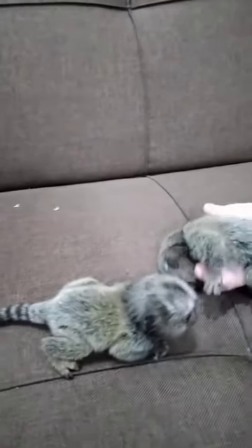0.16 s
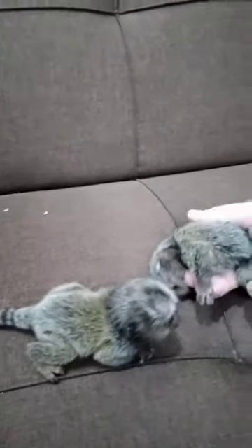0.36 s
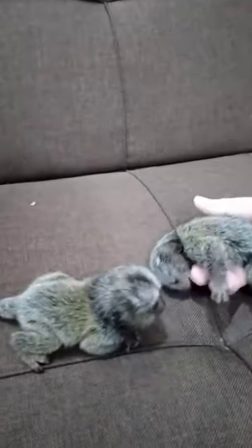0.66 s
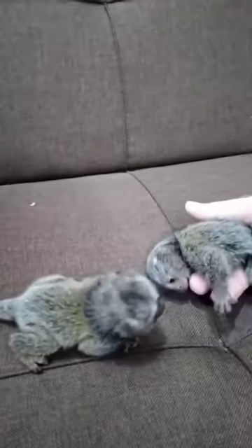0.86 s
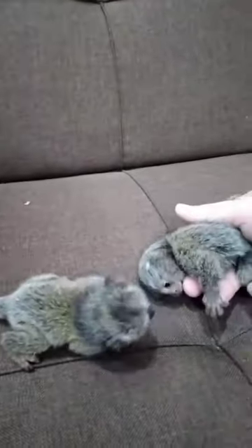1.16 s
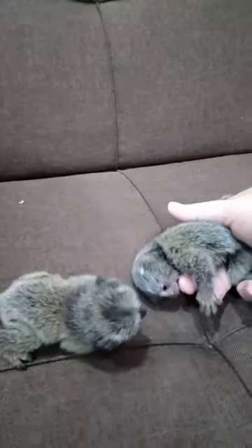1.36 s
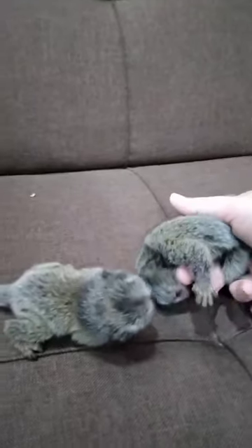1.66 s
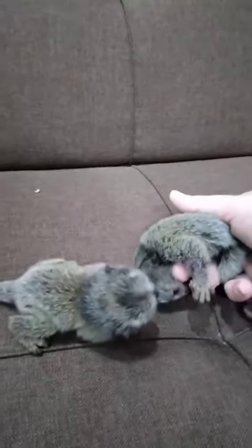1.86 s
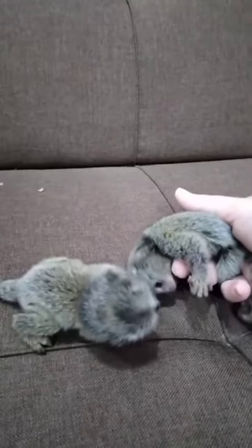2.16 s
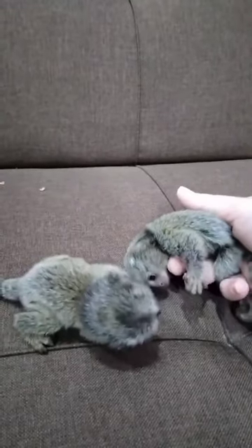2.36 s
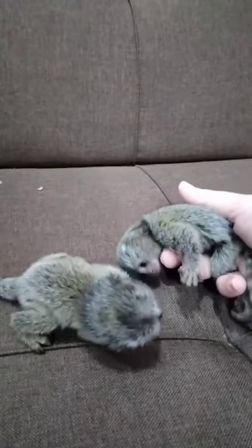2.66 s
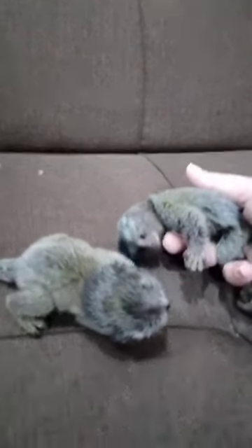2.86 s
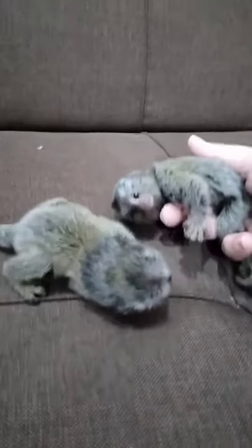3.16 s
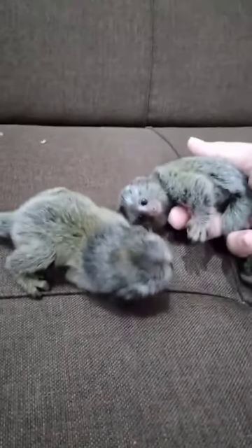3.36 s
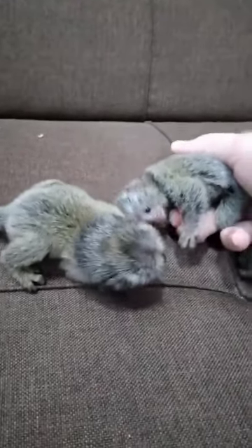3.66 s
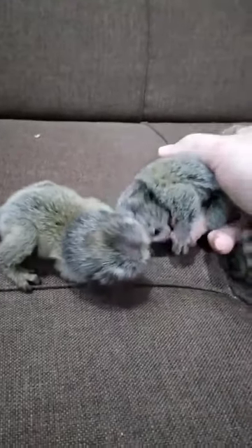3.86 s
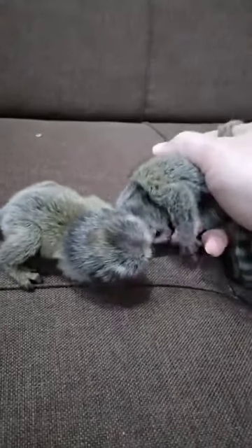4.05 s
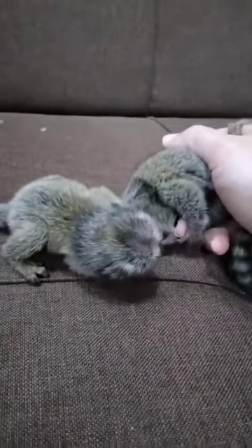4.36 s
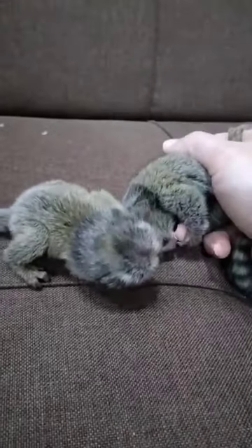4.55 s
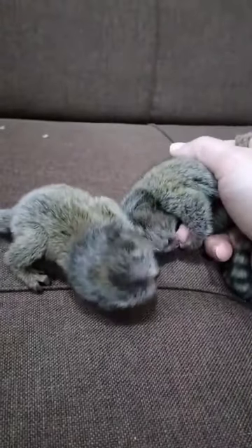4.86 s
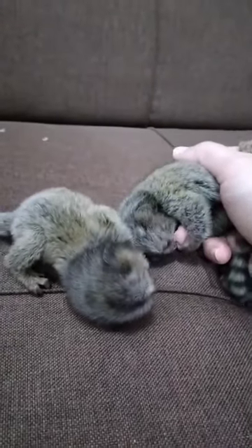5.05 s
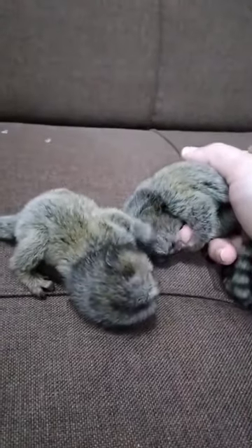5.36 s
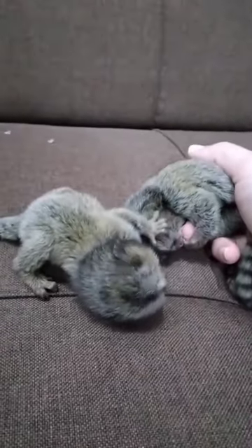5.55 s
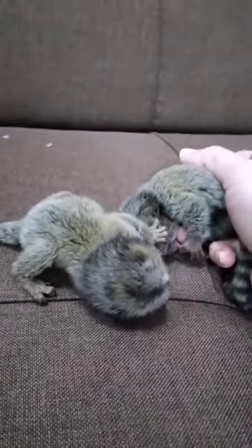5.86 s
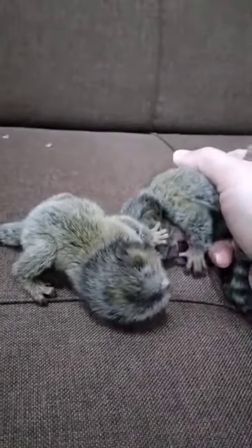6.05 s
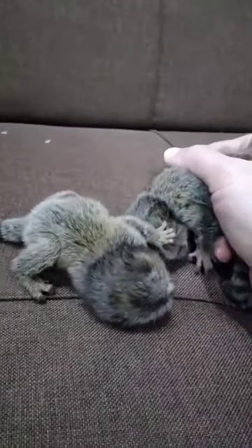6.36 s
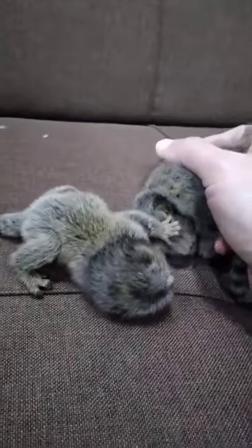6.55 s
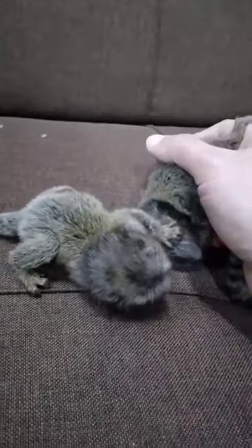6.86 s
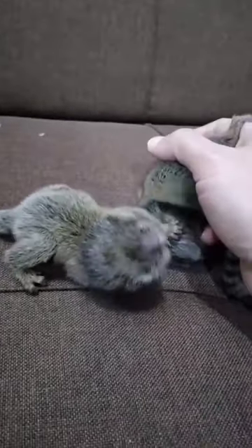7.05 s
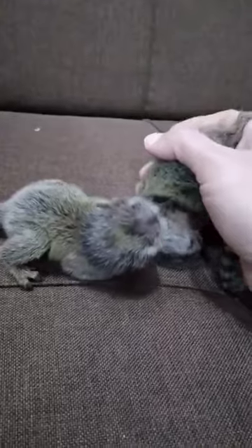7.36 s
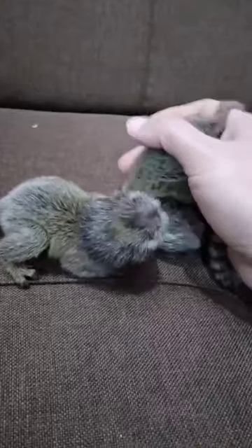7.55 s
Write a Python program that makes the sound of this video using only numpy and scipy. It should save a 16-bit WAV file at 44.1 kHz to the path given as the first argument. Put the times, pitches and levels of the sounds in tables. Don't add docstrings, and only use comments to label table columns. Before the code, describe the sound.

A small room with soft furniture, heard through a phone in mono: quiet hiss, a flickering airy sizzle and thin insect-like trills around five kilohertz, with shriller strokes near nine, run throughout over a faint low engine hum. At 0.2 s a baby monkey gives a tight double chirp near three kilohertz; a weaker falling chirp follows at 0.85 s. The double chirp returns louder at 2.2 s. Quick squeaks shoot upward at 2.7, 3.0 and 3.5 s. From 4.1 to 4.4 s comes the loudest event, a piercing cluster of whistled notes with a bright held core, its echoes dying quickly. Softer rising chirps and peeps scatter afterwards, with another squeak at 5.3 s. Outside, the engine's deep boom swells strongly by 5.9 s, buzzing unsteadily and sagging slightly in pitch. A last double chirp sounds at 6.8 s, then faint notes near 7.3 s as the boom eases.

```python
import sys
import numpy as np
from scipy import signal
from scipy.fft import rfft, irfft
from scipy.io import wavfile
from scipy.ndimage import uniform_filter1d

SR = 44100
rng = np.random.default_rng(int(sys.argv[2]) if len(sys.argv) > 2 else 0)


def voltage_ratio(level):
    return 10 ** (np.asarray(level, float) / 20)


def transcribe(signal):
    frames = np.atleast_2d(signal).T
    limited = np.clip(frames, -1, 1)
    pcm = np.round(limited * 32767).astype(np.int16)
    wavfile.write(sys.argv[1], SR, pcm)


N = 339570

# (frequency [Hz], density [dB per Hz])
HISS_COLOUR = [(12, -49), (20, 8), (44, -0.5), (112, -7), (161, -12.5), (232, -11), (281, -15), (631, -20),
               (1300, -21), (3850, -29.5), (5230, -20), (6910, -31.5), (8880, -24), (11400, -30),
               (15500, -31)]
HISS_DB, ROAD_FOLLOWS = -64, 0.16
# (time [s], peak level [dB])
SIZZLE_SWELLS = [(0.0263, -58), (0.178, -60), (0.2843, -58), (0.4564, -60), (0.6893, -58), (0.9043, -54),
                 (1.1164, -60), (1.4182, -64), (1.714, -62), (1.949, -59), (2.2692, -56), (2.6105, -53),
                 (2.7107, -56), (2.823, -55), (3.1867, -65), (3.4451, -58), (3.6546, -52), (3.8701, -55),
                 (3.9903, -53), (4.2378, -54), (4.5526, -58), (4.8499, -54), (5.4256, -57), (5.7364, -57),
                 (6.0731, -56), (6.3684, -59), (6.9691, -60), (7.224, -58), (7.4545, -59), (7.6141, -58)]
SWELL_RISE_S, SWELL_FALL_S, SIZZLE_REST_DB = 0.019, 0.047, -60.5
SIZZLE_REACHES_DOWN = 0.49

# (time [s], boom through the walls [dB], exhaust buzz [dB])
ENGINE_LEVELS = [(0.0, -67, -69.5), (0.36, -60.5, -63), (1.18, -62.5, -58), (2.66, -55.5, -58),
                 (2.94, -56, -54), (3.54, -50, -63.5), (4.18, -47, -58), (5.17, -46, -55),
                 (5.88, -35.5, -63), (6.26, -36, -52), (6.4, -36, -55.5), (6.82, -37.5, -50.5),
                 (7.06, -37.5, -64), (7.25, -37, -54.5), (7.7, -42.5, -47)]
# (time [s], firing rate [Hz])
FIRING_RATE = [
    (0, 58.92),
    (2.6, 58.37),
    (4.4, 57.92),
    (5.3, 57.14),
    (5.9, 56.21),
    (7.7, 54.97),
]
# (multiple of firing rate, level against the boom [dB])
UPPER_MULTIPLES = [(6, -37), (7, -37), (8, -50.5), (9, -36.5)]
# (multiple of firing rate, level [dB])
BUZZ_MULTIPLES = [(3, -72.5), (4, -74.5), (5, -84.5)]
# (time [s], half length [s], third multiple lift [dB], fourth [dB], fifth [dB])
BUZZ_LIFTS = [(.5, 0.25, 3.7, 2.3, -2), (2.55, 0.12, 6.7, 10.4, -1), (3.45, 0.34, 2, 11, 5),
              (4.9, 0.32, 16, 8.8, 0), (5.5, 0.23, 10, 14.2, 5), (5.93, 0.2, 12.6, 17.2, 12),
              (6.25, 0.14, 4, 14.7, 11), (6.72, 0.24, 9, 13.7, 20), (7.1, .06, 2, 15, 11),
              (7.35, 0.17, 8.1, 6.8, -1), (7.6, 0.2, 4.8, 13.2, 13)]
# (frequency [Hz], level [dB])
FAN_TONES = [(76, -67.5), (574, -80)]

# (low [Hz], high [Hz], ring-out t60 [s])
NEAR_BAND, LOW_BAND, MID_BAND, HIGH_BAND = (4960, 5520, .44), (4620, 4900, 0.45), (5250, 5480, 0.42), (5720, 5850, 0.29)
# (time [s], length [s], level [dB])
NEAR_STROKES = [(0.182, 0.082, -58.5), (0.6, 0.078, -58.5), (0.945, 0.078, -57.5), (1.24, 0.07, -66),
                (1.474, 0.076, -58.5), (1.75, .037, -76), (2.014, .12, -57.5), (2.509, 0.092, -58.5),
                (2.931, 0.086, -58), (3.349, 0.07, -56.5), (3.585, 0.049, -62.5), (3.805, 0.15, -57),
                (4.469, 0.09, -57.5), (4.658, 0.052, -62.5), (5.12, .061, -58.5), (5.449, .091, -71),
                (5.712, 0.098, -58.5), (6.139, 0.051, -71), (6.214, 0.11, -58), (6.726, 0.056, -62.5),
                (6.845, 0.07, -59.5), (7.0, 0.087, -68), (7.34, 0.037, -63), (7.52, .11, -57)]
# (time [s], length [s], level [dB])
LOW_STROKES = [(0.428, 0.046, -75), (0.755, 0.02, -66), (1.76, 0.065, -78), (2.4, .06, -69),
               (3.2, 0.063, -76), (7.355, 0.04, -62), (1.434, 0.076, -66), (1.873, .12, -67),
               (3.755, 0.085, -57.5), (4.062, 0.035, -61), (4.3, 0.06, -66), (4.925, 0.057, -63),
               (5.646, 0.038, -68), (5.973, 0.044, -66), (6.259, 0.056, -63), (6.497, 0.13, -65),
               (7.217, 0.12, -69), (7.622, 0.045, -62)]
# (time [s], length [s], level [dB])
MID_STROKES = [(0, .028, -65), (1.601, 0.052, -77), (1.836, .062, -69), (2.345, 0.077, -65),
               (2.715, 0.096, -63), (4.16, 0.15, -63), (4.864, 0.046, -63), (6.354, 0.039, -68)]
# (time [s], length [s], level [dB])
HIGH_STROKES = [(1.931, 0.077, -65), (3.54, 0.045, -65), (4.88, .04, -66), (5.236, .06, -62.5),
                (6.021, 0.057, -65), (6.918, 0.036, -66), (7.601, 0.065, -65)]
# (time [s], top of sweep [Hz], level [dB])
SHRILL_STROKES = [(0.017, 9440, -71), (0.323, 9650, -65.5), (.575, 9500, -63.5), (1.14, 8700, -66.5),
                  (1.2, 10000, -66.5), (1.538, 8800, -68), (1.686, 9170, -64.5), (2.054, 9760, -64.5),
                  (2.402, 8900, -67), (2.48, 9600, -68), (2.615, 9560, -67), (3.02, 9430, -72),
                  (3.29, 9240, -65), (3.527, 9900, -61.5), (3.859, 10270, -62.5), (4.02, 10000, -60.5),
                  (4.49, 10150, -64), (4.711, 10000, -64.5), (5.13, 9900, -60), (5.274, 10090, -63),
                  (5.451, 9300, -65), (5.94, 9100, -66.5), (6.067, 9300, -66.5), (6.312, 8990, -70),
                  (6.59, 10340, -60), (6.888, 9910, -63), (7.127, 9350, -62), (7.361, 9830, -63.5),
                  (7.63, 9500, -65)]
SHRILL_LOW_HZ, SHRILL_S, SHRILL_T60_S = 8250, .045, 0.41
# (time [s], start [Hz], end [Hz], level [dB])
PEEP_NOTES = [(0.176, 6280, 6760, -69), (0.854, 6480, 5630, -64), (2.185, 6950, 6330, -67),
              (2.19, 5980, 6000, -69), (3.523, 6800, 6680, -64), (3.985, 6660, 6880, -61.5),
              (4.175, 6640, 7430, -65.5), (4.705, 6720, 6900, -64), (2.701, 6100, 6950, -61.5),
              (2.96, 6260, 6900, -64), (5.26, 6500, 7040, -66), (6.22, 3430, 4230, -69),
              (4.75, 3910, 4500, -64), (.19, 10300, 10800, -69), (2.22, 10200, 10900, -70),
              (4.218, 9850, 10900, -66.5), (4.84, 10070, 11330, -60.5), (6.854, 10730, 9900, -66)]
PEEP_S, PEEP_T60_S = 0.034, 0.54

# (time [s], level [dB])
DOUBLE_CHIRPS = [
    (0.174, -51),
    (2.188, -49.5),
    (6.816, -49.5),
]
HIGH_NOTE, LOW_NOTE = (3340, 3180, .028), (3030, 2790, .028)  # (start [Hz], end [Hz], length [s])
LOW_NOTE_LAG_S, HIGH_NOTE_DB, DOUBLE_DIRECT = 0.014, -4, 18
# (time [s], start [Hz], end [Hz], length [s], level [dB])
CRY_OPENING = [
    (4.076, 3000, 3780, 0.04, -42.5),
    (4.09, 2824, 2840, 0.019, -54.5),
    (4.19, 3680, 3770, .02, -66),
]
# (time [s], start [Hz], end [Hz], length [s], level [dB])
CRY_CORE = [
    (4.221, 2370, 2460, .026, -43.5),
    (4.265, 2545, 2610, 0.064, -37.5),
    (4.333, 3255, 3280, 0.055, -47),
]
# (time [s], start [Hz], end [Hz], length [s], level [dB])
CRY_NOTES = [
    (4.188, 2166, 2450, 0.0404, -55),
    (4.222, 2620, 3100, 0.03, -45),
    (4.292, 3990, 3900, 0.015, -66),
    (4.354, 2500, 2780, 0.061, -48.5),
]
OPENING_T60_S, CORE_T60_S, CORE_DIRECT = 0.4, 0.5, 130
# (time [s], start [Hz], level [dB])
FALLING_CHIRPS = [
    (0.071, 3270, -70),
    (0.853, 3395, -61.5),
    (1.138, 2140, -63),
    (3.375, 2660, -67.5),
    (6.192, 3094, -60),
    (1.702, 3600, -73),
]
FALL_RATIO, FALL_S = .79, .031
# (time [s], start [Hz], end [Hz], level [dB])
RISING_CHIRPS = [(1.939, 3100, 3270, -62), (2.065, 2500, 2900, -67), (2.583, 2510, 3010, -64.5),
                 (3.851, 2640, 3165, -65.5), (4.915, 2250, 2560, -60.5), (5.72, 2896, 3450, -66),
                 (5.77, 3240, 3930, -63.5), (5.775, 2406, 2650, -64), (5.925, 2950, 3880, -64),
                 (6.68, 2867, 3930, -69), (6.715, 2400, 2700, -67)]
RISE_S = 0.047
# (time [s], start [Hz], end [Hz], length [s], level [dB])
WHISTLE_NOTES = [(1.714, 3280, 3270, 0.21, -70), (2.679, 2920, 2960, 0.02, -73),
                 (4.82, 3500, 3545, 0.04, -56), (4.969, 515, 515, 0.08, -65),
                 (5.319, 3296, 3285, 0.03, -61), (5.381, 2655, 2555, 0.031, -65),
                 (5.905, 3140, 3190, 0.1, -64), (6.027, 1462, 1363, 0.035, -67),
                 (6.229, 1557, 1630, 0.018, -69), (7.133, 3070, 2674, 0.0407, -62.5),
                 (7.309, 2900, 2750, 0.021, -77), (2.174, 2350, 2290, 0.028, -74),
                 (4.684, 2750, 2956, 0.062, -60.5), (2.58, 3480, 3590, .03, -74)]
NEAR_T60_S, CRY_T60_S, FAR_T60_S, WHISTLE_T60_S = 0.33, 0.44, 0.59, 0.42

# (time [s], start [Hz], end [Hz], length [s], level [dB])
AIMED_NOTES = [(.19, 2970, 2930, .019, -48.5), (2.69, 2810, 2880, .022, -62),
               (2.706, 3500, 3620, .016, -64), (2.995, 2800, 2880, 0.018, -63),
               (4.982, 2480, 2520, .03, -59), (5.85, 2440, 2480, .02, -68), (6.203, 3000, 2720, 0.021, -63),
               (6.256, 2450, 2420, .025, -66), (5.982, 3170, 3180, .045, -62), (6.07, 3190, 3180, .08, -69),
               (6.835, 2980, 2800, .04, -56), (4.9, 3800, 3230, .025, -68), (4.42, 2500, 2740, 0.0608, -53),
               (7.31, 2720, 2950, .04, -64), (.875, 3200, 3050, .02, -64), (.885, 2780, 2700, .02, -67),
               (7.143, 3050, 2900, .025, -64), (4.71, 2750, 3000, .04, -63), (4.11, 3400, 3560, .03, -50),
               (4.13, 3560, 3330, .03, -51)]
AIMED_T60_S, AIMED_DIRECT = .25, 90
# (time [s], start [Hz], end [Hz], length
# [s], level [dB])
FAINT_NOTES = [(4.022, 3120, 2500, .035, -60), (4.878, 3590, 3630, .045, -55.5),
               (4.99, 4080, 3850, .025, -69), (6.06, 2080, 2080, 0.048, -73), (7.24, 3200, 3520, .08, -71),
               (7.2, 2830, 2760, .07, -68), (6.89, 2790, 2750, .03, -66), (6.1, 2800, 2760, .04, -70),
               (4.2, 2800, 4200, .03, -60), (4.3, 2900, 2150, .06, -58), (4.9, 2050, 3400, .08, -65),
               (1.245, 5280, 5520, .06, -66.5), (1.08, 5400, 5000, .03, -73), (.845, 5400, 6500, .04, -71),
               (1.935, 2150, 2250, 0.032, -73), (1.705, 3270, 3290, .02, -72), (1.56, 5000, 5540, .06, -69),
               (7.31, 2720, 2700, .03, -69), (4.975, 2470, 2530, .05, -59.5), (3.99, 4900, 3900, .05, -64),
               (2.585, 2600, 4200, .05, -68), (.19, 5400, 6000, .04, -66), (4.46, 2780, 2620, .09, -64),
               (5.32, 2750, 2560, .05, -65), (2.815, 5300, 5500, .02, -66), (3.3, 6000, 6400, .04, -75),
               (3.9, 4700, 4100, .08, -70), (3.54, 5750, 5800, .06, -67), (3.42, 2150, 2050, .03, -72),
               (4.77, 3100, 4400, .05, -66), (3.51, 2680, 2760, .03, -68), (3.03, 2900, 4200, .03, -66),
               (5.3, 3300, 4700, .025, -66), (4.86, 3700, 5000, .03, -66), (4.03, 3200, 4300, .03, -68),
               (3.6, 3000, 4800, .04, -65), (2.72, 3600, 6000, .03, -66), (3.0, 3800, 5200, .03, -68),
               (4.4, 3270, 3260, .05, -60), (4.24, 2750, 3050, .025, -55), (5.28, 2800, 3000, .03, -63),
               (4.4, 2900, 4300, .04, -67), (.2, 3250, 2950, .025, -60), (2.21, 3250, 2950, .025, -60)]
# (time [s], start [Hz], end [Hz], length [s], level [dB], overtone [dB])
SQUEAK_CALLS = [
    (2.678, 2700, 5030, 0.032, -57.5, 0),
    (2.962, 2583, 4900, 0.04, -60, -3),
    (3.53, 2750, 5400, 0.05, -59, -6),
    (3.995, 2600, 3000, 0.018, -60.5, -3),
    (4.72, 3000, 5010, 0.04, -65, -11),
    (5.272, 2735, 4780, 0.036, -57, -11),
    (7.31, 2700, 4300, 0.03, -65, -13),
]
# (from [s], to [s], low [Hz], high [Hz], level [dB])
THINNED_TREBLE = [
    (4.101, 4.183, 8300, 10200, -6),
    (4.11, 4.183, 11600, 15700, -5),
    (4.235, 4.45, 8500, 9500, -13),
]


def track(table):
    s, *columns = np.transpose(table)
    return [np.interp(np.arange(N) / SR, s, c) for c in columns]


def walk(rate):
    k = int(SR / rate)
    return 1.18 * uniform_filter1d(np.repeat(rng.standard_normal(N // k + 1), k), k)[:N]


def band(spectrum, lo_hz, hi_hz):
    f = np.arange(N // 2 + 1) * SR / N
    return irfft(spectrum * ((f >= lo_hz) & (f < hi_hz)), N)


def sizzle_level():
    s, peak_db = np.transpose(SIZZLE_SWELLS)[:, :, None]
    late = np.arange(0, N, 64) / SR - s
    shape = np.exp(np.where(late < 0, late / SWELL_RISE_S, -late / SWELL_FALL_S))
    return np.repeat(((peak_db - SIZZLE_REST_DB) * shape).max(axis=0), 64)[:N]


def hiss():
    f = np.arange(N // 2 + 1) * SR / N + 1e-3
    hz, db = np.transpose(HISS_COLOUR)
    colour = voltage_ratio(np.interp(np.log(f), np.log(hz), db))
    colour *= 1 - .3 * np.exp(-((f - 3700) / 1000) ** 2) - .22 * np.exp(-((f - 6900) / 800) ** 2)
    noise = colour * rfft(rng.standard_normal(N))
    noise *= voltage_ratio(HISS_DB) / np.std(band(noise, 300, 2000))
    road, sizzle = ROAD_FOLLOWS * track(ENGINE_LEVELS)[0], sizzle_level()
    road = road - road.mean()
    sizzle = sizzle - sizzle.mean()
    edges = 15.1 * 2 ** np.arange(0, 10, .5)
    out, flicker = 0, walk(20)
    for lo, hi in zip(edges, edges[1:]):
        swell_db = road * np.clip(250 / lo, 0, 1.3) + .8 * walk(3) * (lo < 2500)
        treble_db = (.9 * flicker + .8 * walk(16)) * (lo > 3000)
        treble_db = treble_db + SIZZLE_REACHES_DOWN * sizzle * (lo > 7000)
        out = out + voltage_ratio(swell_db + treble_db) * band(noise, lo, hi)
    for lo, hi, trim_db in [(edges[-1], 12200, -2.5), (12200, 14000, .8), (14000, 15700, .3)]:
        flutter_db = .9 * flicker + 1.9 * walk(45) + 1.1 * walk(26)
        out = out + voltage_ratio(sizzle + trim_db + flutter_db) * band(noise, lo, hi)
    return out


def lifted(s, half_s, *lift_db):
    return np.outer(lift_db, np.exp(-((np.arange(N) / SR - s) / half_s) ** 2))


def engine():
    (hz,), (boom_db, buzz_db) = track(FIRING_RATE), track(ENGINE_LEVELS)
    phase = 2 * np.pi * np.cumsum(hz * (1 + 0.00703 * walk(14))) / SR
    orders = [(1, boom_db), (2, buzz_db)]
    orders += [(k, boom_db + rel_db) for k, rel_db in UPPER_MULTIPLES]
    lifts = np.max([lifted(*row) for row in BUZZ_LIFTS], axis=0)
    orders += [(k, db + lift) for (k, db), lift in zip(BUZZ_MULTIPLES, lifts)]
    drone = 0
    for k, db in orders:
        waver_db = min(0.42 * k, 2.5) * walk(16)
        drone = drone + voltage_ratio(db + waver_db) * np.sin(k * phase + 6 * rng.random())
    turns = 2 * np.pi * np.cumsum(1 + 0.00775 * walk(9)) / SR
    fan = sum(voltage_ratio(fan_db + 2 * walk(4.3)) * np.sin(fan_hz * turns) for fan_hz, fan_db in FAN_TONES)
    return np.sqrt(2) * (drone + fan)


def echoed(s, hz0, hz1, length, db, t60, overtone_db=-60, shape="glide", build=.006, hold=.055, direct=11):
    u = np.arange(int(length * SR)) / int(length * SR)
    strokes = np.cumsum(70 * (1 + 0.275 * np.sin(9 * u + 6 * rng.random()))) / SR
    bend = {"glide": 0.677 * (1 - np.cos(np.pi * u)) / 2 + 0.329 * u,
            "squeak": u ** 1.7,
            "trill": (2 * abs(strokes % 1 - .5)) ** .6}[shape]
    swell = {"glide": 1, "squeak": voltage_ratio(-8 * bend), "trill": voltage_ratio(-5 * u)}[shape]
    shake = np.interp(u * length, np.arange(64) / 250, rng.standard_normal(64))
    rough = .02 + .12 * np.minimum(abs(hz1 - hz0) / hz0, .2)
    pitch_hz = (hz0 + (hz1 - hz0) * bend) * (1 + rough * shake / 3)
    phase = 2 * np.pi * np.cumsum(pitch_hz) / SR
    envelope = swell * voltage_ratio(2.5 * shake[::-1]) * np.sin(np.pi * u) ** 0.3
    call = envelope * (np.sin(phase) + voltage_ratio(overtone_db) * np.sin(2 * phase))
    t = np.arange(SR // 2) / SR
    patches = voltage_ratio(2.2 * np.interp(t, np.arange(21) / 60, rng.standard_normal(21)))
    decay = voltage_ratio(-60 * np.maximum(t - hold, 0) / t60)
    path = rng.standard_normal(SR // 2) * patches * (1 - np.exp(-t / build)) * decay
    path[0] = direct
    heard = signal.fftconvolve(call, path)
    loudest = np.sqrt(uniform_filter1d(heard ** 2, size=SR // 12).max())
    return int(s * SR), heard * voltage_ratio(db) / loudest


def placed(calls):
    out = np.zeros(N + SR)
    for start, sound in calls:
        out[start:start + len(sound)] += sound
    return out[:N]


def insects():
    rows = [(s, hz0, hz1, PEEP_S, db, PEEP_T60_S) for s, hz0, hz1, db in PEEP_NOTES]
    for (lo_hz, hi_hz, t60), strokes in [(NEAR_BAND, NEAR_STROKES), (LOW_BAND, LOW_STROKES),
                                         (MID_BAND, MID_STROKES), (HIGH_BAND, HIGH_STROKES)]:
        rows += [(s, hi_hz, lo_hz, length, db, t60) for s, length, db in strokes]
    shrill = [(s, hz, SHRILL_LOW_HZ, SHRILL_S, db, SHRILL_T60_S) for s, hz, db in SHRILL_STROKES]
    calls = [echoed(*row, shape="trill", hold=0.0043) for row in rows]
    calls += [echoed(*row, shape="trill", hold=0.0029) for row in shrill]
    return placed(calls)


def chirps():
    near = [(s, *HIGH_NOTE, db + HIGH_NOTE_DB, NEAR_T60_S) for s, db in DOUBLE_CHIRPS]
    near += [(s + LOW_NOTE_LAG_S, *LOW_NOTE, db, NEAR_T60_S) for s, db in DOUBLE_CHIRPS]
    rows = [(*row, OPENING_T60_S) for row in CRY_OPENING]
    rows += [(*row, CRY_T60_S) for row in CRY_NOTES]
    rows += [(s, hz, hz * FALL_RATIO, FALL_S, db, CRY_T60_S) for s, hz, db in FALLING_CHIRPS]
    rows += [(s, hz0, hz1, RISE_S, db, FAR_T60_S) for s, hz0, hz1, db in RISING_CHIRPS]
    rows += [(*row, WHISTLE_T60_S) for row in WHISTLE_NOTES]
    calls = [echoed(*row, direct=DOUBLE_DIRECT) for row in near]
    calls += [echoed(*row, CORE_T60_S, hold=0.02, direct=CORE_DIRECT) for row in CRY_CORE]
    calls += [echoed(*row) for row in rows]
    return placed(calls)


def asides():
    aimed = [echoed(*row, AIMED_T60_S, hold=.02, direct=AIMED_DIRECT) for row in AIMED_NOTES]
    return placed(aimed + [echoed(*row, WHISTLE_T60_S) for row in FAINT_NOTES])


def squeaks():
    calls = []
    for *note, overtone_db in SQUEAK_CALLS:
        calls.append(echoed(*note, 0.55, overtone_db, shape="squeak", build=0.012, hold=0.025, direct=6.7))
    return placed(calls)


def scene():
    return (hiss() + engine() + insects() + chirps() + asides() + squeaks())[None]


def band_limit(x):
    return signal.sosfilt(signal.butter(12, 15640, fs=SR, output="sos"), x)


def record(dry):
    t, x = np.arange(N) / SR, dry[0]
    for t0, t1, lo_hz, hi_hz, db in THINNED_TREBLE:
        during = uniform_filter1d(1. * ((t > t0) & (t < t1)), size=600)
        x = x - (1 - voltage_ratio(db)) * during * band(rfft(x), lo_hz, hi_hz)
    return band_limit(x[None])


dry = scene()
out = record(dry)
transcribe(out)
```